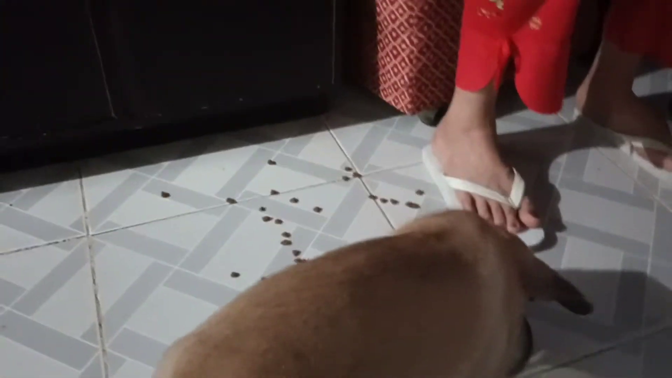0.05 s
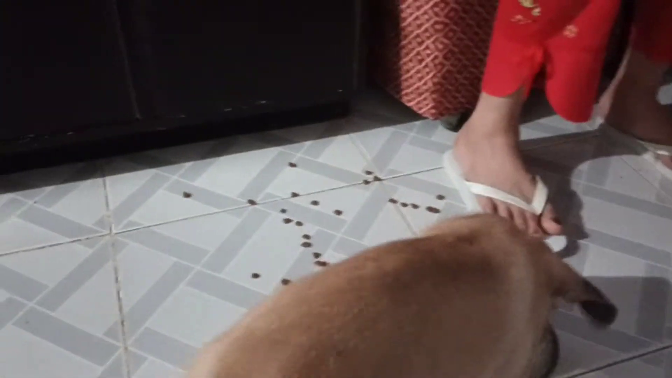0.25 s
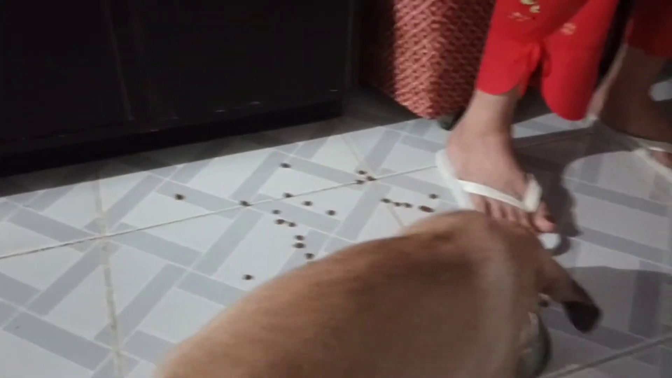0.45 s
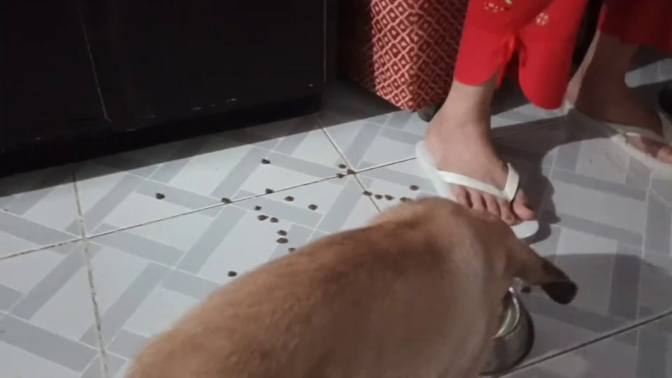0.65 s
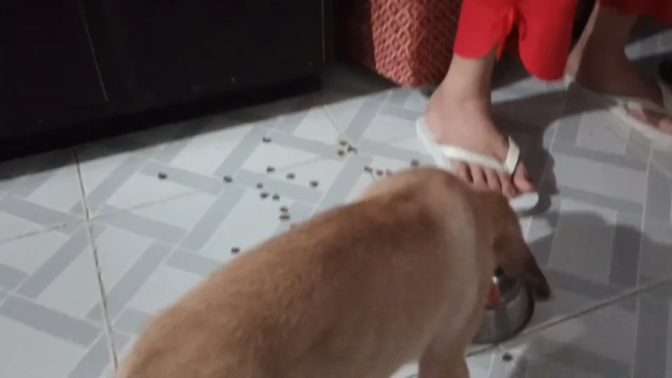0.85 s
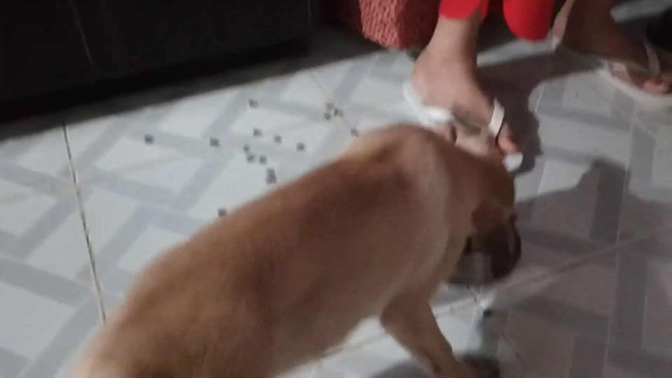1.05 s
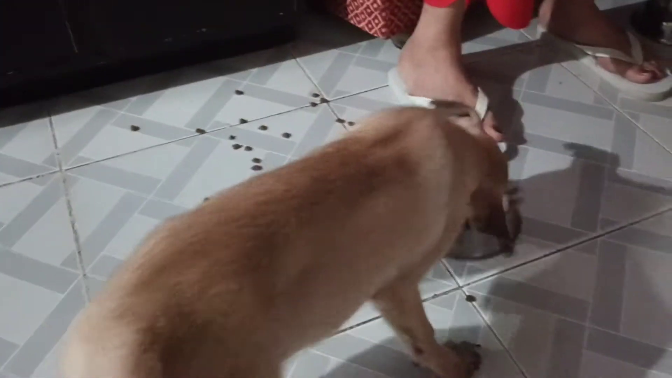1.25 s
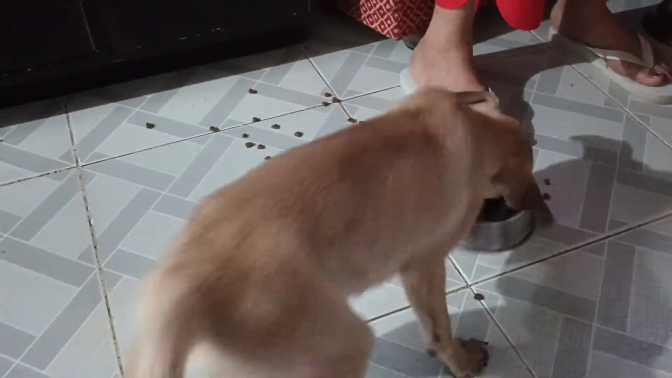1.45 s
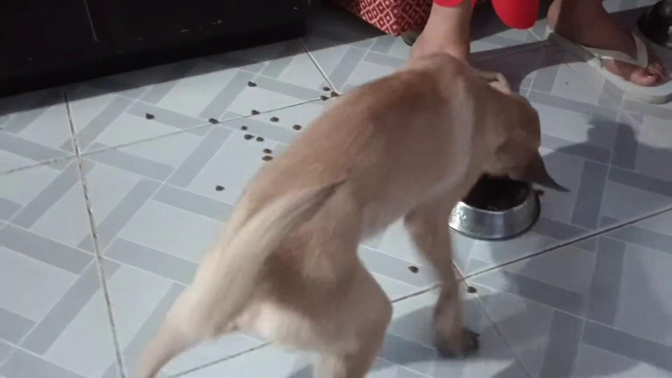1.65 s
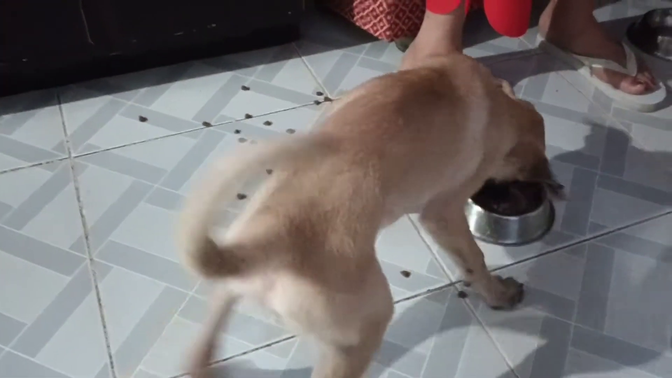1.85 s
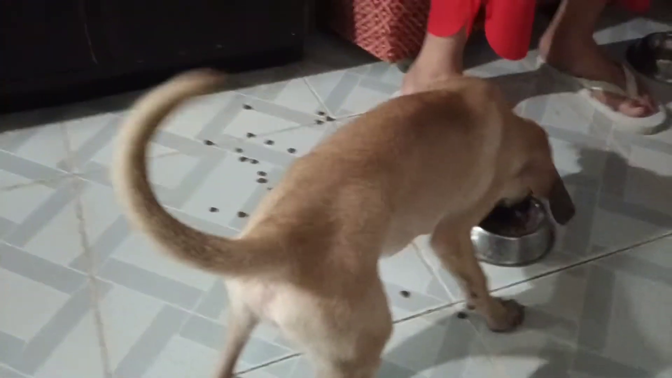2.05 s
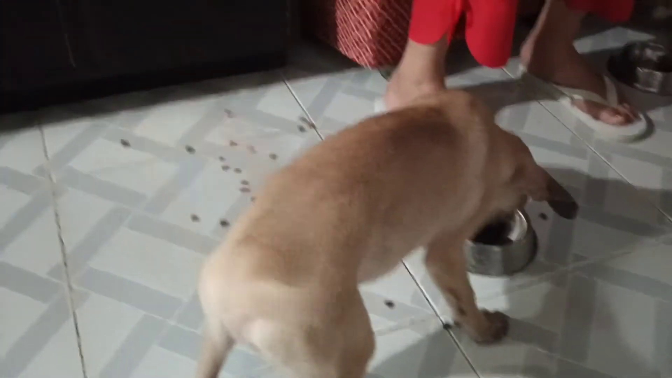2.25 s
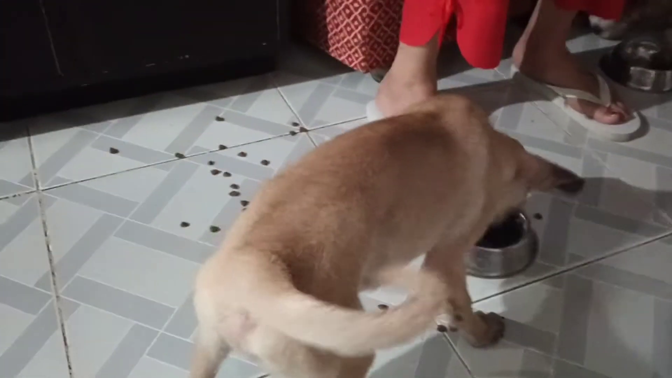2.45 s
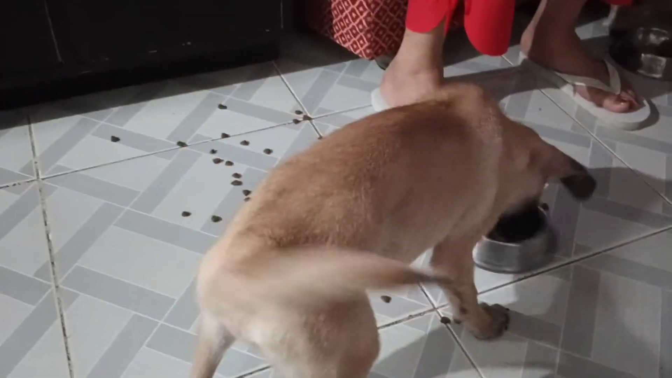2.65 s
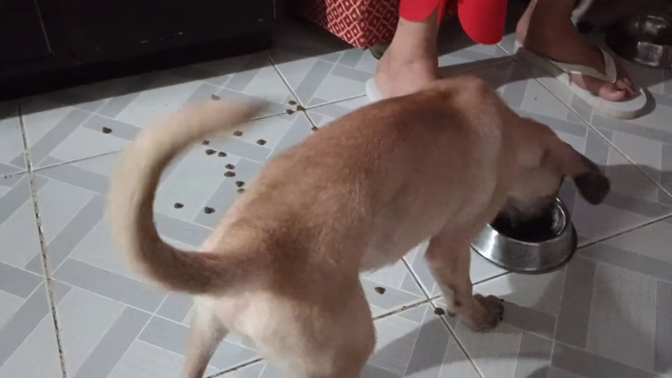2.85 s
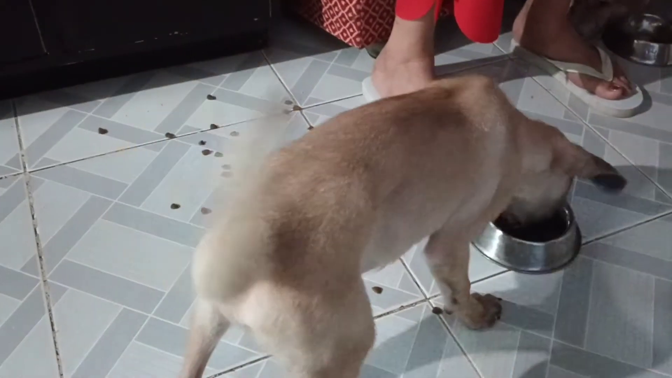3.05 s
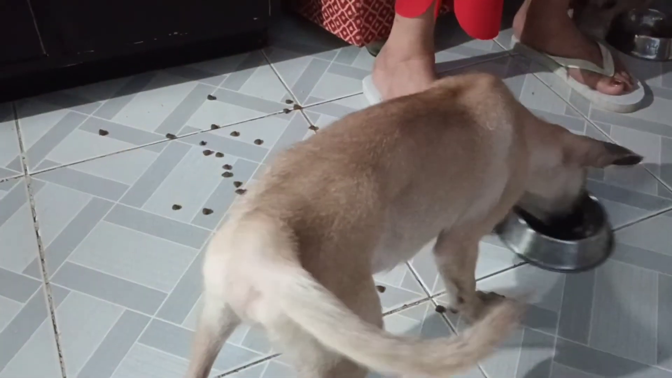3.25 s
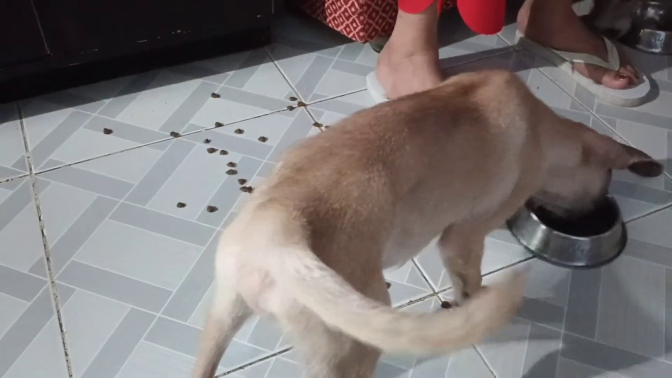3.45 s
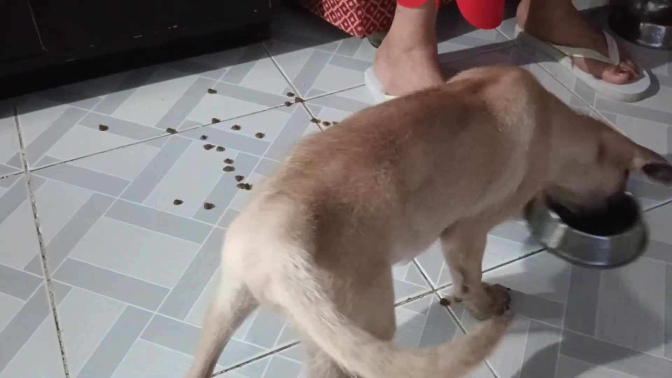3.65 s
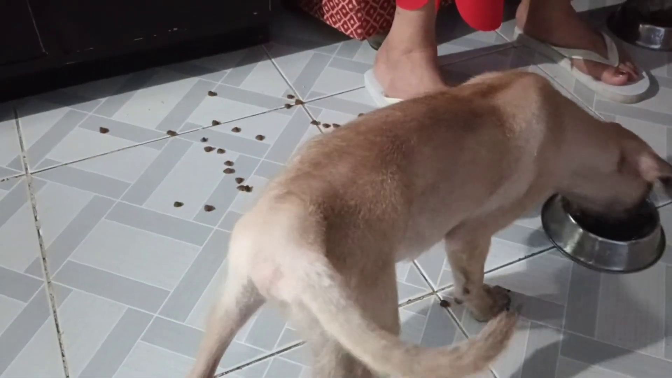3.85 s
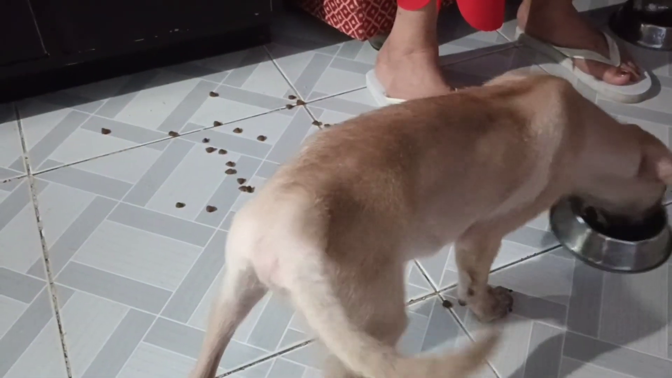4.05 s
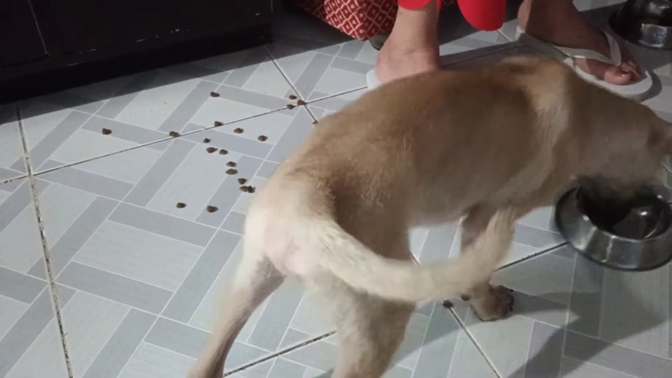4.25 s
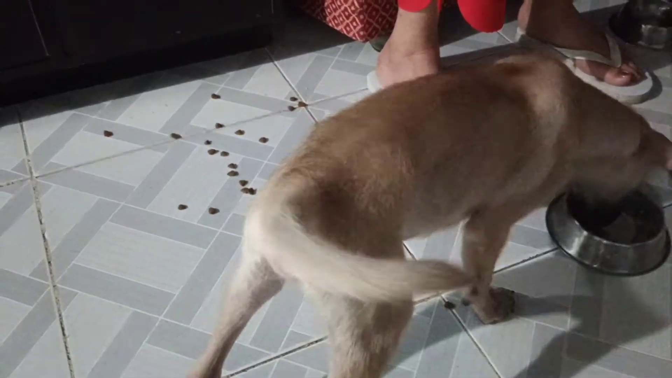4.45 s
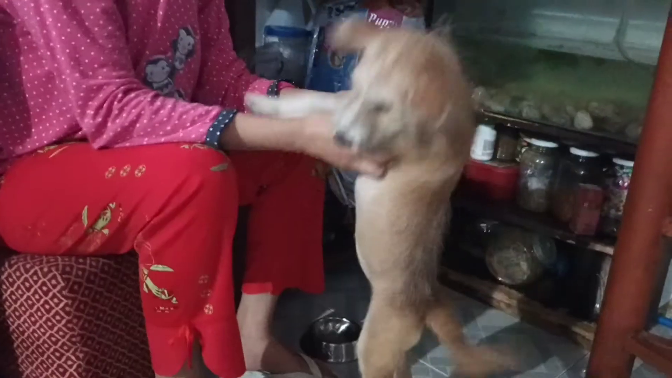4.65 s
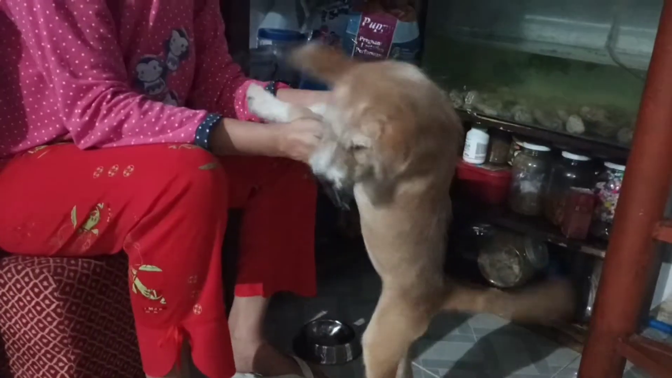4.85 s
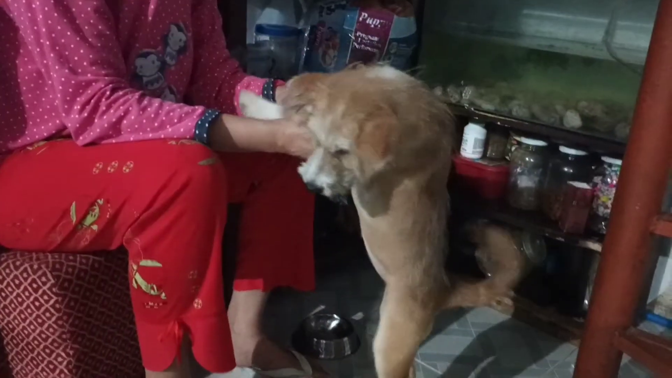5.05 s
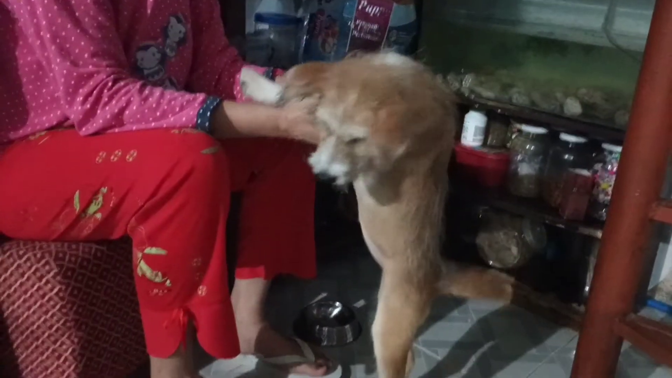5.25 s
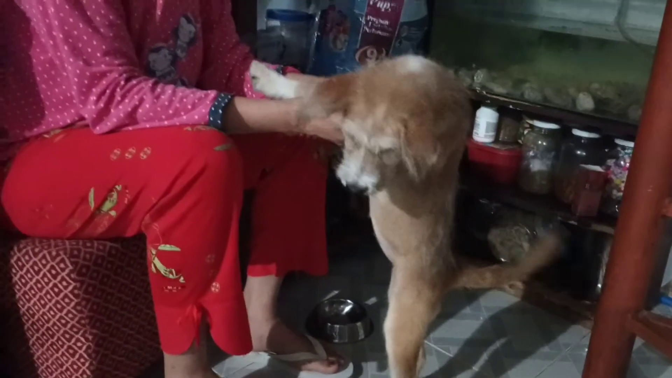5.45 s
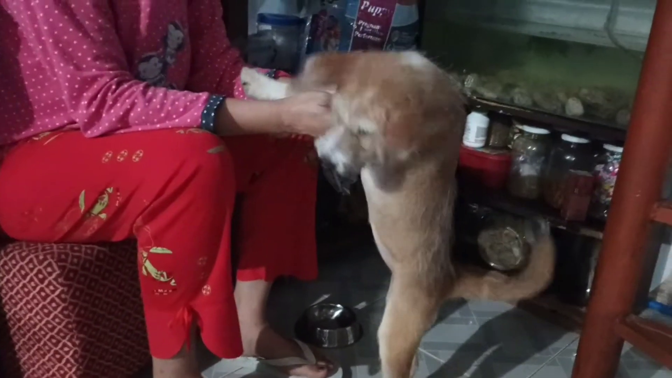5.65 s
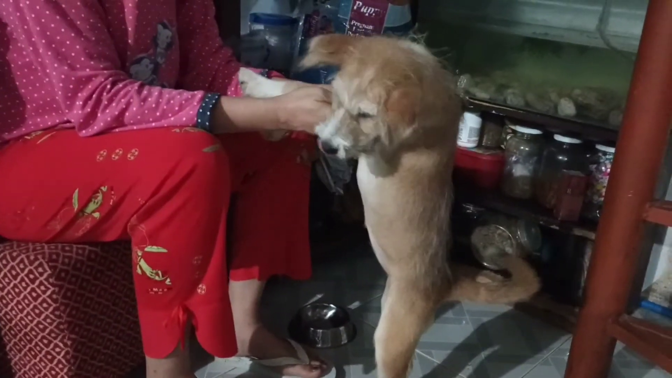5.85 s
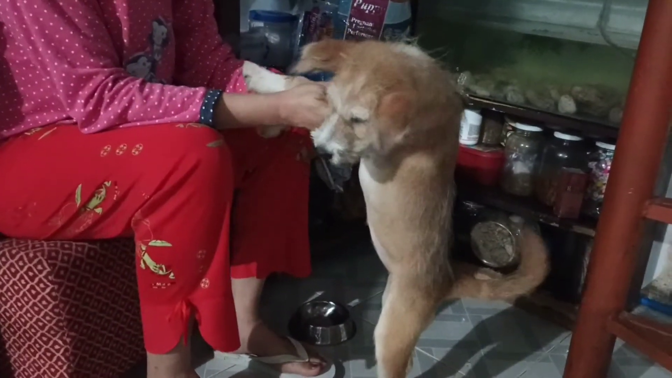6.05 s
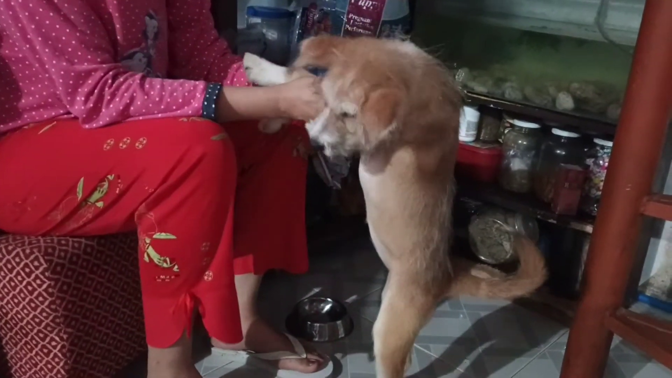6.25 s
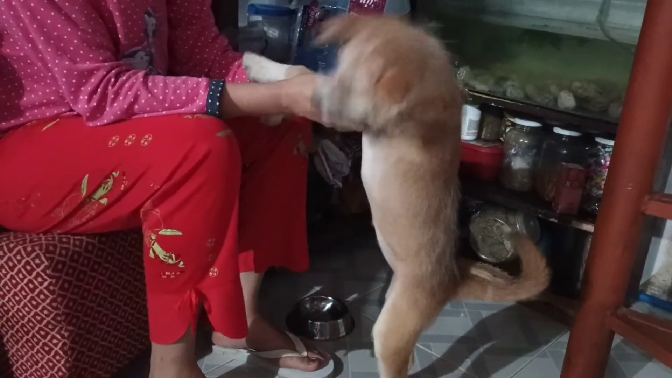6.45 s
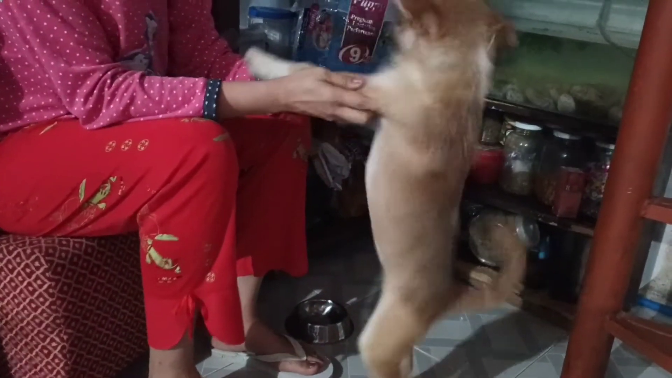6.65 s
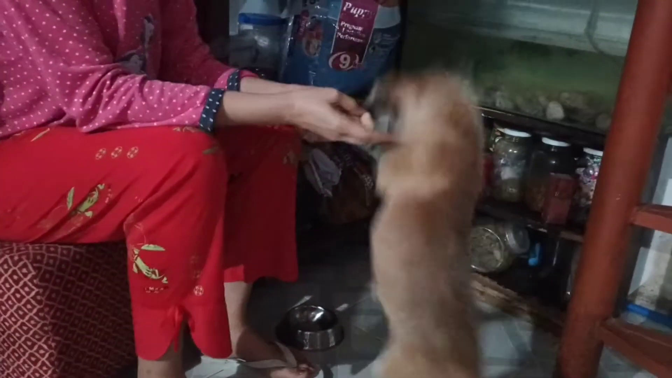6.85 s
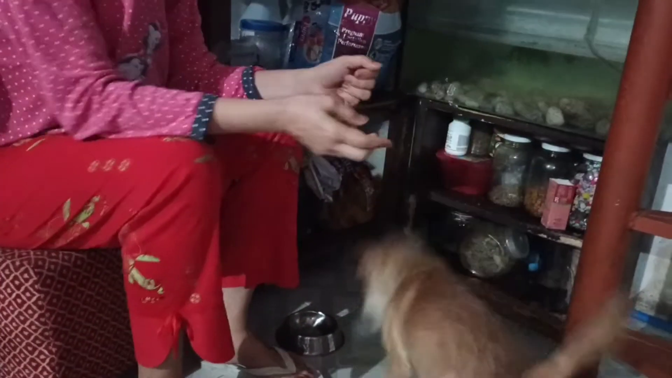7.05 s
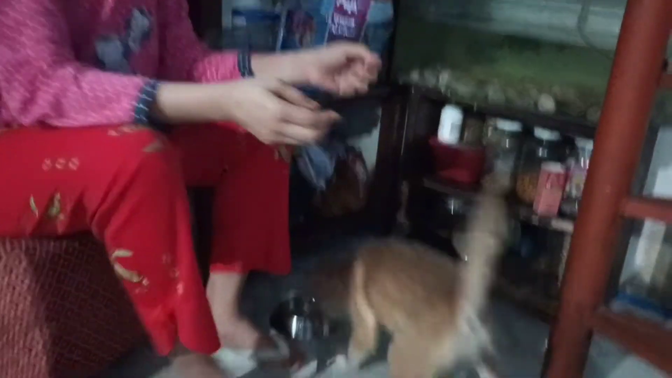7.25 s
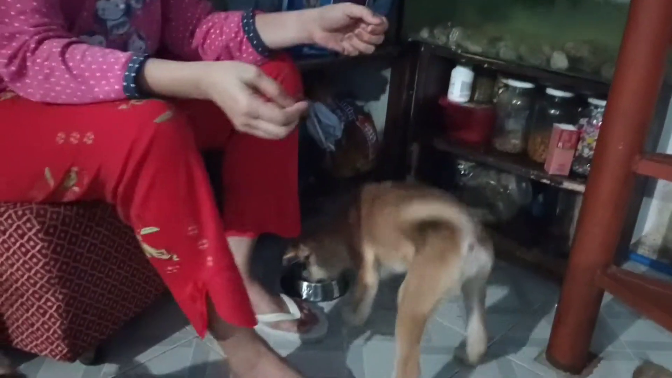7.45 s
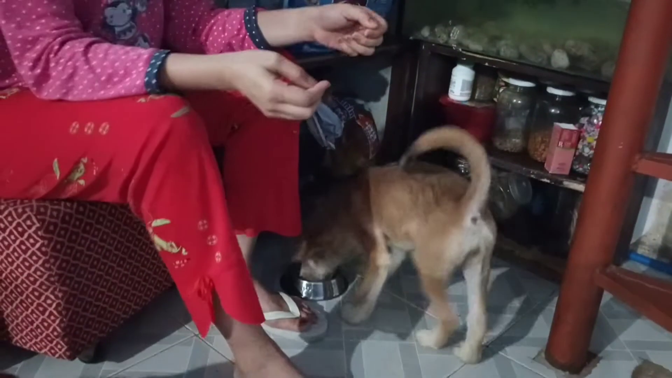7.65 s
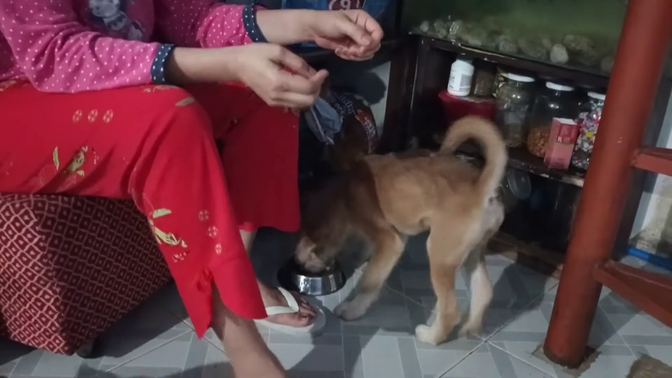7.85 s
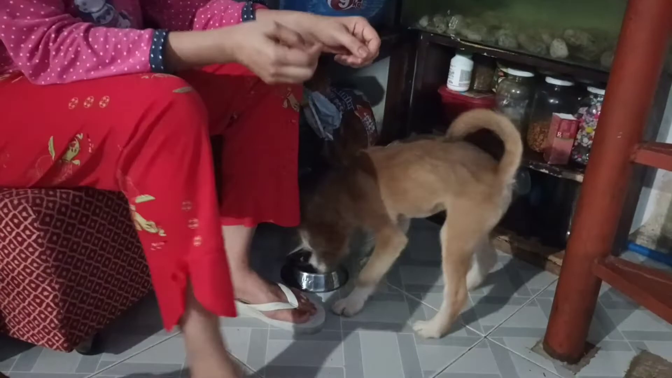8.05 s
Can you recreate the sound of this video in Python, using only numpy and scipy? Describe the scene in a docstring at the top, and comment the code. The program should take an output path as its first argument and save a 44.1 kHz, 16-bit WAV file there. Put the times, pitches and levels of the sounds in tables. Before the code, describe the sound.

Quick showers of kibble clatter in a metal bowl with cracks and licks, fade to small smacks and paw scuffs, then rattle again at the end.

```python
"""A dog roots through dry kibble in a steel bowl in quick shoves of its muzzle; later a puppy digs into another.
Each shove is a shower of tiny random impacts, filtered by pellets, ringing steel and the hollow under the muzzle.
Around them: chews, licks and cracks, paws, claws, rustles, thumps and knocks, scraping pellets and thin tones,
made of friction grains, short noise clicks or wavering sines. A small hard room answers, over faint still air."""
import sys
import numpy as np
from scipy import signal
from scipy.fft import rfft, irfft, next_fast_len
from scipy.io import wavfile
from scipy.ndimage import uniform_filter1d

SR = 44100
rng = np.random.default_rng(int(sys.argv[2]) if len(sys.argv) > 2 else 0)


def persist_wave(psi):
    """Save psi, clipped to +-1, as 16-bit WAV."""
    counts = np.round(np.clip(psi, -1, 1) * 32767).astype(np.int16)
    wavfile.write(sys.argv[1], SR, np.atleast_2d(counts).T)


N = 357651
FRAME = 2 ** 14  # samples: no single contact or tone outlasts this 0.37 s
HZ = np.fft.rfftfreq(FRAME, 1 / SR)
TIME = np.arange(FRAME) / SR


def amp(db):
    """Decibels to gain."""
    return 10 ** (np.asarray(db) / 20)


def unit(x):
    """x scaled to rms 1."""
    return x / np.sqrt(np.mean(x ** 2) + 1e-20)


def along(points, hz):
    """Values of (Hz, value) points, read on a log frequency axis."""
    point_hz, value = np.transpose(points)
    return np.interp(np.log(hz + 1), np.log(point_hz + 1), value)


def resonance(hz, width_hz):
    """Power response of one steep-sided resonance."""
    detuning = (HZ ** 2 - hz ** 2) / (HZ * width_hz + 1)
    return 1 / (1 + detuning ** 2) ** 2


# The dog's and the puppy's shoves of the muzzle. Each row: start in seconds, rise in seconds (at least 1 ms),
# length in seconds, pitch of the hollow in Hz, knock of the bowl in dB, rattle of the pellets in dB.
SHOVES = [(0, 0.0046, 0.016, 710, -46.5, -39), (0.058, .001, 0.0017, 780, -61.5, -30.5),
          (0.903, 0.038, 0.061, 930, -36.5, -26), (0.974, 0.0074, 0.079, 880, -46.5, -39.5),
          (1.111, 0.0081, 0.12, 640, -32, -27.5), (1.34, 0.0037, 0.012, 975, -53.5, -35.5),
          (1.367, 0.0037, 0.084, 1150, -37, -27), (1.571, 0.0022, 0.016, 500, -37.5, -38),
          (1.588, 0.0064, 0.11, 600, -38, -28), (1.882, 0.0022, 0.011, 500, -64, -45),
          (2.344, 0.0055, 0.085, 1230, -55, -37.5), (2.46, 0.0032, 0.0068, 1236, -66.5, -34),
          (2.553, .024, 0.14, 620, -34, -28.5), (2.862, 0.0064, 0.064, 1034, -42, -30.5),
          (3.071, 0.049, .15, 625, -34.5, -25.5), (3.337, 0.0044, 0.066, 700, -37.5, -35.5),
          (3.455, 0.0076, 0.056, 614, -39, -41), (3.52, .005, 0.038, 630, -32.5, -29),
          (3.551, 0.0016, .16, 645, -33.5, -27.5), (3.789, 0.0087, 0.038, 555, -42.5, -42),
          (3.905, .003, 0.098, 700, -54.5, -43.5), (3.977, 0.015, 0.061, 626, -39, -36),
          (4.171, 0.027, 0.1, 512, -46, -32.5), (7.823, 0.0073, 0.024, 622, -29, -37.5),
          (7.846, 0.0032, 0.15, 678, -32, -24), (8.002, 0.0031, 0.17, 630, -32.5, -27)]
PUPPY_FROM_S = 4.6  # shoves from here on are the puppy's
# Ringing modes of each steel bowl. Each row: pitch in Hz, width in Hz before broadening,
# level in dB before the overall steel level.
DOG_BOWL_MODES = [(1487, 13, -5.5), (2282, 69, -9), (3157, 64, -17.5), (3930, 35, -13), (4587, 190, -7),
                  (5212, 160, -2.5), (6044, 154, -4.5), (6190, 500, -10), (6850, 110, -6), (7220, 37, -20),
                  (7400, 30, -1.5), (8317, 35, 1), (9440, 62, -11), (10600, 18, -3.5), (10440, 180, -0.5),
                  (11085, 320, -1.5), (13300, 60, -13), (11900, 150, -7), (13800, 61, -2.5),
                  (14700, 52, -2), (15200, 32, 7.5), (15700, 57, -6.5)]
PUPPY_BOWL_MODES = [(1216, 44, 2), (2090, 26, 3.5), (2374, 8.3, 9.5), (4580, 200, -7), (5400, 120, -3),
                    (5950, 170, -7), (6170, 96, 3), (7050, 34, -2), (8070, 280, -5), (8200, 200, -7),
                    (10600, 160, -18), (10730, 41, -7), (11080, 82, 1)]
# Colour of tumbling pellets. Each row: frequency in Hz, relative level in dB per Hz.
PELLET_COLOUR = [(60, -39.5), (150, -19), (270, -20), (360, -12), (500, -1.5), (900, -4.5), (1500, -9.5),
                 (1800, -23.5), (2250, -6), (2800, -21.5), (4000, -20.5), (4700, -13), (6400, -4),
                 (8000, -10), (10800, 5), (13300, -12), (15000, -12)]
GAP_HZ, GAP_WIDTH_HZ, GAP_DB_PER_S = 3300, 3000, 1  # a thinner pile crackles less between the modes of the steel


def kibble(shoves, modes, steel_db, hollow_db, hollow_width_hz, rate, spread_db, sag_db, settle_s):
    """Each shove tumbles pellets against the steel; the muzzle tunes the hollow and rebalances the modes."""
    track = np.zeros((2, N))
    steel = np.array([amp(db + steel_db) ** 2 * resonance(hz, 1.7 * width) for hz, width, db in modes])
    pellets = amp(along(PELLET_COLOUR, HZ)) ** 2
    for s, rise, length, hollow_hz, knock_db, rattle_db in shoves:
        mode_balance = amp(2 * rng.standard_normal(len(steel))) ** 2
        ring = mode_balance @ steel
        eaten_s = s - shoves[0][0]
        gap = amp(-GAP_DB_PER_S * eaten_s * resonance(GAP_HZ, GAP_WIDTH_HZ)) ** 2
        hollow = amp(hollow_db) ** 2 * resonance(hollow_hz, hollow_width_hz)
        power = gap * pellets * (1 + hollow) + ring
        avalanche = impacts(rate, spread_db) * clumps(per_s=110, depth_db=4.5)
        force = avalanche * stroke(rise, length, sag_db, settle_s)
        levels_db = shove_levels(hollow_hz, knock_db, rattle_db, eaten_s)
        add(track, s, sounding(force, power, levels_db))
    return track


THUD_BELOW_KNOCK_DB = 27
OPEN_HOLLOW_HZ = 600  # the hollow with the muzzle half way in
CLATTER_DB, CLATTER_DB_PER_OCTAVE = -1.5, 3.5  # against the mean of knock and rattle; a raised muzzle frees more
THINNING_DB_PER_S = 1.3  # the clatter fades as the pile is eaten


def shove_levels(hollow_hz, knock_db, rattle_db, eaten_s):
    """Levels of a shove: the thud follows the knock, the clatter starts from the mean of knock and rattle."""
    opening_db = CLATTER_DB_PER_OCTAVE * np.log2(hollow_hz / OPEN_HOLLOW_HZ)
    clatter_db = (knock_db + rattle_db) / 2 + CLATTER_DB + opening_db - THINNING_DB_PER_S * eaten_s
    return np.array([knock_db - THUD_BELOW_KNOCK_DB, knock_db, clatter_db, rattle_db])


def impacts(rate, spread_db):
    """Tiny blows of scattered size at random moments, as mid and side of rms 1."""
    chance, size, mid, side = rng.random((4, FRAME))
    blows = (chance < rate / SR) * amp(spread_db * size)
    return unit(blows * np.sign(np.array([mid, side]) - .5))


def clumps(per_s, depth_db):
    """Pellets or grains move in small avalanches: a quickly changing gain of rms 1."""
    knots = np.arange(0, FRAME / SR, 1 / per_s)
    gain_db = depth_db * np.interp(TIME, knots, rng.uniform(-1, 1, len(knots)))
    return unit(amp(gain_db))


def stroke(rise, length, sag_db, settle_s):
    """Strength of a movement: it builds, slackens, then dies away."""
    push = np.minimum(TIME / max(rise, 1e-3), 1) * amp(sag_db * (.5 - np.minimum(TIME / length, 1)))
    return push * np.exp(-np.maximum(TIME - length, 0) / settle_s)


def shifting(x, depth_db):
    """As the muzzle and pellets move about, each resonance waxes and wanes within a single bite."""
    bins = signal.stft(x, nperseg=512, noverlap=256)[2]
    field = rng.standard_normal(bins.shape[1:])
    field = uniform_filter1d(field, size=4, axis=0)  # smooth over frequency
    field = uniform_filter1d(field, size=6, axis=1)  # smooth over time
    gain = unit(amp(depth_db * np.clip(unit(field), -2, 2)))
    return signal.istft(bins * gain, nperseg=512, noverlap=256)[1][:, :N]


# Borders in Hz between the thud, knock, clatter and rattle registers.
SPLIT_HZ = (280, 850, 3000)


def registers():
    """Shares of the thud, knock, clatter and rattle registers at each frequency."""
    below = [1 / (1 + (HZ / hz) ** 10) for hz in SPLIT_HZ]
    return np.diff([np.zeros_like(HZ), *below, np.ones_like(HZ)], axis=0)


REGISTERS = registers()
# Stereo width of every contact. Each row: frequency in Hz, side minus mid in dB.
WIDTH = [(60, 3.5), (160, -20), (380, -11.5), (700, -6.5), (1300, 0.5), (2400, 0), (4400, 0.5),
         (8100, -1.5), (11000, -10.5), (15000, -9.5)]
MID_SIDE = np.array([np.ones_like(HZ), amp(along(WIDTH, HZ))])


def sounding(force, power, levels_db):
    """A force heard through a body with this power spectrum, each register at its level, as mid and side."""
    knots = np.arange(0, SR / 2, 130)  # Hz
    ripple = amp(2.2 * np.interp(HZ, knots, rng.standard_normal(len(knots))))
    parts = REGISTERS * power * ripple ** 2  # every contact point favours other fine resonances
    gain = np.sqrt((amp(levels_db) ** 2 / parts.mean(axis=1)) @ parts)
    return irfft(rfft(force) * causal(gain) * MID_SIDE)


def causal(gain):
    """The minimum-phase response with this gain, which rings only after a blow."""
    cepstrum = irfft(np.log(np.maximum(gain, 1e-6)))
    cepstrum[1:FRAME // 2] *= 2
    cepstrum[FRAME // 2 + 1:] = 0
    return np.exp(rfft(cepstrum))


# Chews and licks. Each row: start in seconds, length in seconds, pitch of the mouth in Hz, level in dB,
# treble in dB against that level.
CHEWS = [(0.048, 0.13, 806, -67, -27), (0.196, 0.37, 1670, -68.5, -8.5), (2.05, 0.23, 2330, -65.5, 4.5),
         (2.129, 0.016, 1270, -41, 4.5), (2.188, 0.081, 1420, -49.5, -11), (2.967, 0.072, 1830, -55, 0),
         (3.251, 0.42, 1770, -58, 2.5), (4.555, 0.21, 2166, -77.5, -0.5), (4.87, 0.02, 980, -42.5, -1),
         (4.947, .045, 1040, -50, -9.5), (5.046, 0.025, 2230, -53, -5.5), (5.153, 0.032, 1085, -56.5, -6),
         (5.424, 0.068, 1100, -52.5, -18.5), (5.866, 0.037, 1780, -75, -6), (6.095, 0.04, 1820, -75, -11.5),
         (7.442, 0.075, 1320, -59, -5.5)]
# Pellets cracking, lips smacking and teeth clicking. Each row: start in seconds, low resonance in Hz,
# high resonance in Hz, level in dB, treble in dB against that level.
CRACKS = [(.029, 920, 4100, -28.5, 0), (.06, 2170, 6800, -40.5, 5), (0.446, 1630, 3890, -56.5, -0.5),
          (.69, 2030, 5800, -47, 2), (0.829, 2370, 5500, -46.5, 0), (2.024, 1340, 3150, -44.5, -2.5),
          (2.152, 1190, 2400, -29, -8), (2.165, 1230, 3640, -34, 3), (2.254, 1390, 5500, -51, 10.5),
          (2.469, 1300, 3980, -31, 3), (3.088, 1020, 10400, -34, 3.5), (4.814, 1200, 4650, -48.5, -25),
          (4.862, 1116, 8540, -28.5, -5.5), (5.09, 2220, 3320, -34.5, -7), (5.131, 1960, 4060, -34.5, -4.5),
          (5.403, 1456, 5150, -62.5, 17)]
# Colour of each: thud, knock and clatter in dB against its level; the rattle is the treble of each row.
CHEW_DB = (-32.5, -20.5, -2)
CRACK_DB = (-25, -18, 0.5)
LIPS_HZ = 13800  # the lips muffle a bite above this
CRACK_T60_S = .03


def mouths():
    """Chews and licks are wet friction, with sharp cracks and smacks between; the lips dull them all."""
    chews = [(s, rub(length, db, (*CHEW_DB, treble_db), hz, high_hz=3300, rise_share=0.24))
             for s, length, hz, db, treble_db in CHEWS]
    cracks = [(s, tap(db, (*CRACK_DB, treble_db), low_hz, high_hz, CRACK_T60_S))
              for s, low_hz, high_hz, db, treble_db in CRACKS]
    return filtered(played(chews + cracks), lambda hz: 1 / (1 + (hz / LIPS_HZ) ** 8))


# Paws scuffing the floor. Each row: start in seconds, length in seconds, pitch in Hz, level in dB,
# grit in dB added to clatter and rattle.
SCUFFS = [(5.132, 0.018, 660, -40, -15), (6.204, 0.058, 740, -71.5, -3), (6.302, 0.12, 700, -81.5, 6.5),
          (6.425, 0.099, 750, -76.5, 13), (6.519, 0.088, 476, -56.5, -3), (6.619, 0.063, 596, -62.5, -9),
          (6.781, .16, 1010, -65.5, 2.5), (6.931, 0.056, 583, -42.5, -13), (7.025, 0.11, 460, -58.5, -6),
          (7.263, 0.075, 565, -48, -6.5), (7.33, 0.065, 705, -56.5, -3.5), (7.653, 0.059, 450, -41, -0.5)]
# Fur and cloth rustling. Each row: start in seconds, length in seconds, pitch of the hiss in Hz, level in dB.
RUSTLES = [(0.851, 0.39, 10100, -62.5), (4.731, 0.094, 10900, -69), (5.716, 0.098, 6200, -80),
           (6.064, 0.03, 4970, -71.5), (6.417, 0.44, 10800, -78.5), (6.854, .1, 10800, -91),
           (6.987, .12, 10850, -59.5), (7.173, 0.16, 11000, -63.5), (7.506, 0.44, 10300, -56.5),
           (7.725, 0.092, 10300, -48.5)]
# Dull thumps on the floor. Each row: start in seconds, length in seconds, level in dB.
THUMPS = [(0.821, 0.2, -72.5), (1.366, 0.08, -56), (1.604, 0.1, -55), (2.352, 0.06, -63.5),
          (4.695, 0.054, -64.5), (4.858, 0.032, -65), (7.07, .05, -72)]
# Hollow knocks against a bowl or the floor. Each row: start in seconds, pitch in Hz, level in dB.
KNOCKS = [(3.549, 634, -21.5), (3.904, 513, -37), (7.241, 630, -45.5), (8.083, 714, -26)]
# Claws ticking. Each row: start in seconds, level in dB.
TICKS = [(4.542, -50), (6.251, -46), (6.778, -51)]
# Colour of each: thud, knock, clatter and rattle in dB against its level.
SCUFF_DB = (-35, -2.5, -1, -4)
RUSTLE_DB = (-35, -24, -17.5, 4)
THUMP_DB = (6, -10, -30.5, -37.5)
KNOCK_DB = (-24.5, 4.5, -21.5, -1.5)
TICK_DB = (-32, -39, -12.5, 1.5)


def movements():
    """Paws scuff and fur brushes cloth as friction; thumps are low rubs, knocks and ticks short clicks."""
    upper = np.array([0, 0, 1, 1])  # grit under a paw raises clatter and rattle
    scuffs = [(s, rub(length, db, SCUFF_DB + grit_db * upper, hz, high_hz=3230, rise_share=.22))
              for s, length, hz, db, grit_db in SCUFFS]
    rustles = [(s, rub(length, db, RUSTLE_DB, low_hz=560, high_hz=hz, rise_share=.1, high_db=7, high_share=0.52))
               for s, length, hz, db in RUSTLES]
    thumps = [(s, rub(length, db, THUMP_DB, low_hz=165, high_hz=3400, rise_share=0.067, low_db=-1))
              for s, length, db in THUMPS]
    knocks = [(s, tap(db, KNOCK_DB, hz, high_hz=10500, click_t60=0.073)) for s, hz, db in KNOCKS]
    ticks = [(s, tap(db, TICK_DB, low_hz=727, high_hz=10200, click_t60=0.016)) for s, db in TICKS]
    return played(scuffs + rustles + thumps + knocks + ticks)


# Loose pellets scraping over the tiles. Each row: start in seconds, length in seconds, level in dB.
SCRAPES = [(0.593, 0.031, -59), (0.658, 0.034, -65.5), (0.711, 0.019, -50)]
# Their colour: thud, knock, clatter and rattle in dB against that level.
SCRAPE_DB = (-19, -20.5, 4, -2.5)
SCRAPE_LEAN_DB = -7.5  # left minus right


def scrapes():
    """Spilt pellets are pushed over the tiles as gritty friction, off to the right."""
    track = played([(s, rub(length, db, SCRAPE_DB, low_hz=1207, high_hz=5700, rise_share=0.15))
                    for s, length, db in SCRAPES])
    return left_right(room(track, wet_db=-5.5)) * lean(SCRAPE_LEAN_DB)


def rub(length, db, colour_db, low_hz, high_hz, rise_share, low_db=7.5, high_db=2, high_share=0.94):
    """Fine friction grains under one lick or rub, which builds for a share of its length."""
    grains = impacts(rate=2700, spread_db=14.5) * clumps(per_s=90, depth_db=4.5)
    force = grains * stroke(rise_share * length, length, sag_db=2, settle_s=0.0098)
    body = soft_body(low_hz, high_hz, low_db, high_db, low_share=0.4, high_share=high_share)
    return sounding(force, body, np.add(db, colour_db))


def tap(db, colour_db, low_hz, high_hz, click_t60):
    """A short click of decaying noise that rings the mouth, claw or bowl."""
    force = rng.standard_normal((2, FRAME)) * amp(-60 * TIME / click_t60)
    body = soft_body(low_hz, high_hz, low_db=19, high_db=14.5, low_share=0.13, high_share=0.12)
    return sounding(force, body, np.add(db, colour_db))


# Colour of soft contacts. Each row: frequency in Hz, relative level in dB per Hz.
SOFT_COLOUR = [(60, -30), (110, -19.5), (190, 0), (300, -6.5), (480, 2.5), (1200, -3), (2500, -9),
               (5000, -9), (8300, -13), (10800, -6.5), (13300, -19), (15500, -14)]


def soft_body(low_hz, high_hz, low_db, high_db, low_share, high_share):
    """Power spectrum of a small contact: two resonances, each a share of its pitch wide."""
    low = amp(low_db) ** 2 * resonance(low_hz, low_share * low_hz)
    high = amp(high_db) ** 2 * resonance(high_hz, high_share * high_hz)
    return amp(along(SOFT_COLOUR, HZ)) ** 2 * (1 + low + high)


# Faint thin tones. Each row: start in seconds, length of the whole swell in seconds, pitch in Hz, level in dB.
TONES = [(5.244, 0.089, 621, -65), (6.197, 0.69, 733, -73.5)]


def tones(waver):
    """A thin sine of wavering pitch swells and fades; a swell longer than the frame is cut short."""
    track = np.zeros((2, N))
    knots = np.linspace(0, TIME[-1], 24)
    for s, length, hz, db in TONES:
        pitch = hz * (1 + waver * np.interp(TIME, knots, rng.standard_normal(24)))
        swell = np.sqrt(np.abs(np.sin(np.pi * np.minimum(TIME / length, 1))))
        tone = np.sqrt(2) * swell * np.sin(2 * np.pi * np.cumsum(pitch) / SR)
        add(track, s, amp(db) * tone * np.array([[1], [.4]]))  # mid, side
    return track


# Reverberation of the room. Each row: frequency in Hz, time to fall by 60 dB in seconds.
ROOM = [(200, 0.032), (550, 0.2), (1400, 0.25), (3700, 0.34), (9700, 0.21), (15000, 0.15)]


def room(x, wet_db):
    """Direct sound plus a decaying noise tail of tiles and cupboards, scaled to keep the power."""
    hz, t, noise = signal.stft(rng.standard_normal((2, FRAME)), SR, nperseg=256)
    decay = amp(-60 * t / along(ROOM, hz)[:, None])
    tail = signal.istft(noise * decay, SR, nperseg=256)[1]
    tail = np.pad(tail / np.linalg.norm(tail[0]), ((0, 0), (SR // 400, 0)))  # starts 2.5 ms late
    wet = signal.oaconvolve(x, tail, axes=1)[:, :N]
    return (x + amp(wet_db) * wet) / np.hypot(1, amp(wet_db))


# Colour of the quiet room. Each row: frequency in Hz, relative level in dB per Hz.
QUIET_COLOUR = [(15, -44.5), (25, -10), (114, 2), (354, -4), (439, -3), (962, -8), (1480, -6.5),
                (3160, -19), (10700, -9), (13200, -14), (16000, -17)]
QUIET_DB = -75  # mean of mid and side, before the side is lowered


def still_air():
    """Steady coloured noise of the quiet room, narrowed in stereo."""
    noise = filtered(rng.standard_normal((2, N)), lambda hz: amp(along(QUIET_COLOUR, hz)))
    return left_right(amp(QUIET_DB) * unit(noise) * amp([[0], [-4]]))  # mid, side in dB


def filtered(x, response):
    """A whole track times a function of frequency."""
    size = next_fast_len(N + FRAME, True)
    return irfft(rfft(x, size) * response(np.fft.rfftfreq(size, 1 / SR)), size)[..., :N]


def left_right(mid_side):
    """Mid and side to left and right."""
    mid, side = mid_side
    return np.array([mid + side, mid - side])


def lean(db):
    """Left and right gains for a left minus right difference."""
    return amp(db * np.array([[.5], [-.5]]))


def add(track, s, sound):
    """Mix a sound into a track at s seconds."""
    part = track[:, max(round(s * SR), 0):][:, :sound.shape[1]]
    part += sound[:, :part.shape[1]]


def played(sounds):
    """One track from (s, sound) pairs."""
    track = np.zeros((2, N))
    for s, sound in sounds:
        add(track, s, sound)
    return track


# Where the animals are. Each row: time in seconds, left minus right in dB.
PLACE = [(0, -1), (2.5, -2), (2.901, 1), (5.262, 2.5), (5.419, 8.5), (6.1, 7), (7.2, 3), (8.11, 1.5)]
# Lean of the bowls, added to the place. Each row: frequency in Hz, left minus right in dB.
BOWL_LEAN = [(200, 0.5), (700, 0.5), (1300, -4), (2400, -2.5), (4400, 0), (8100, 3.5), (15000, -1.5)]


def scene():
    """Both bowls, the small sounds of the animals and the still air of the room."""
    dog_shoves = [row for row in SHOVES if row[0] < PUPPY_FROM_S]
    puppy_shoves = [row for row in SHOVES if row[0] >= PUPPY_FROM_S]
    dog = kibble(dog_shoves, DOG_BOWL_MODES, steel_db=5.5, hollow_db=7.5, hollow_width_hz=140,
                 rate=1300, spread_db=10.5, sag_db=5.5, settle_s=0.017)
    puppy = kibble(puppy_shoves, PUPPY_BOWL_MODES, steel_db=3.5, hollow_db=16.5, hollow_width_hz=100,
                   rate=1900, spread_db=6.0, sag_db=1.0, settle_s=0.0082)
    eating = left_right(room(shifting(dog + puppy, depth_db=3.6), wet_db=0))
    above_bass = lambda hz: 1 - 1 / (1 + (hz / 125) ** 6)  # nothing of the bowls sounds below about 125 Hz
    bowls = filtered(eating, lambda hz: above_bass(hz) * lean(along(BOWL_LEAN, hz)))
    small = left_right(room(mouths() + movements() + tones(waver=0.018), wet_db=0))
    place_db = np.interp(np.arange(N) / SR, *np.transpose(PLACE))
    return (bowls + small) * lean(place_db) + scrapes() + still_air()


TOP_HZ = 15800  # middle of the 200 Hz wide upper band edge


def record(dry):
    """The highest peaks are rounded off softly, then the treble stops at a steep band limit."""
    rounded = dry / (1 + (dry / .38) ** 4) ** .25
    return filtered(rounded, lambda hz: np.clip((TOP_HZ - hz) / 200 + .5, 0, 1))


dry = scene()
out = record(dry)
persist_wave(out)
```